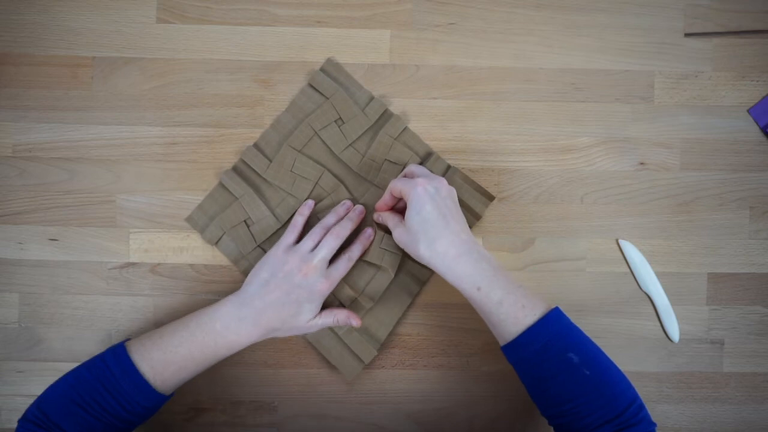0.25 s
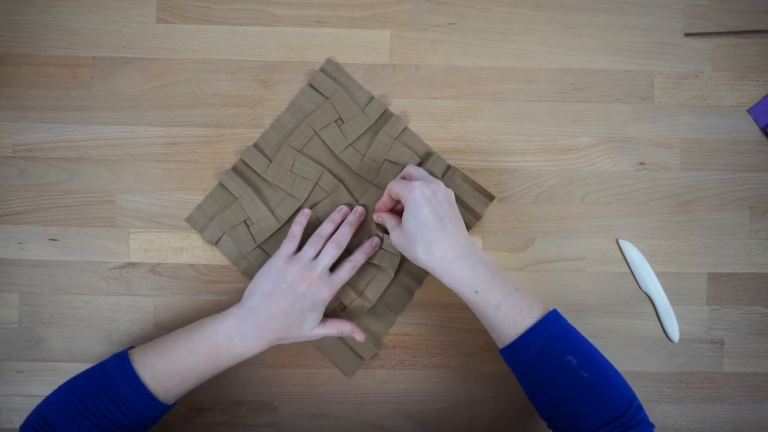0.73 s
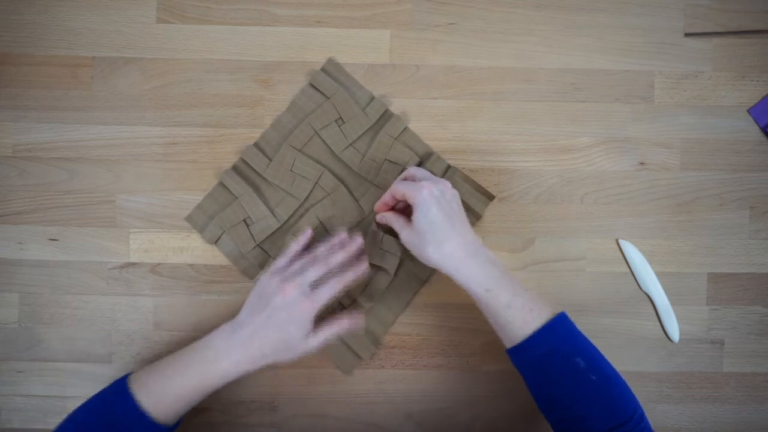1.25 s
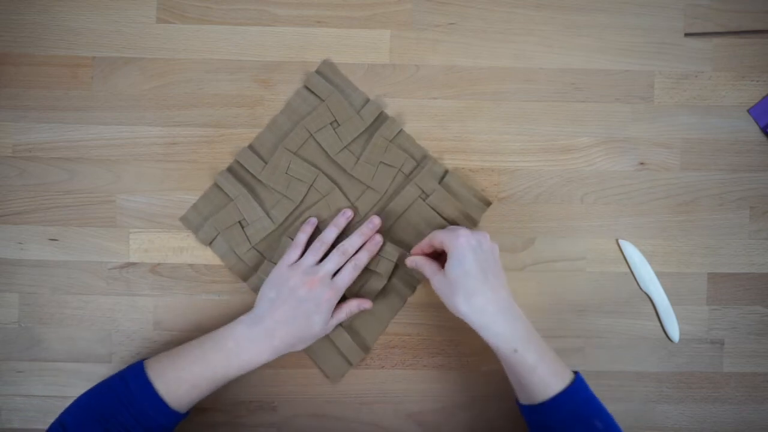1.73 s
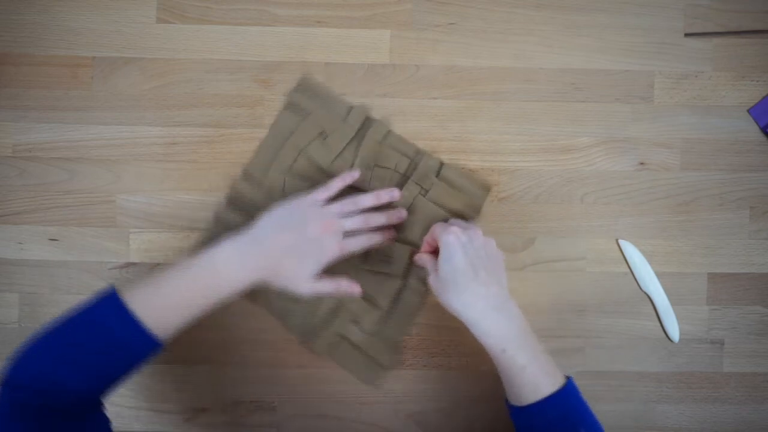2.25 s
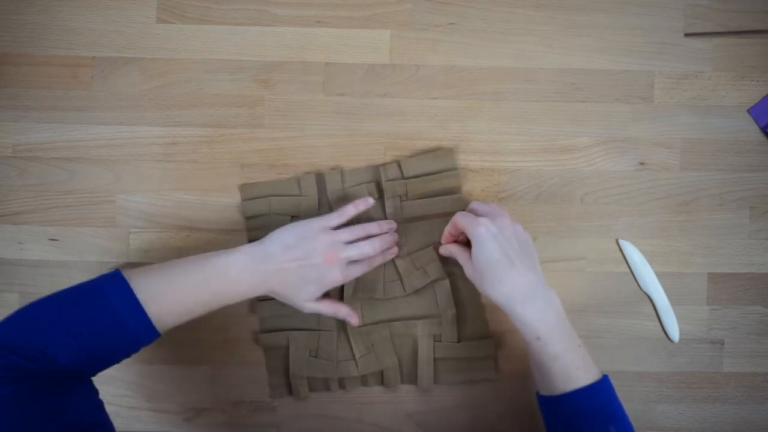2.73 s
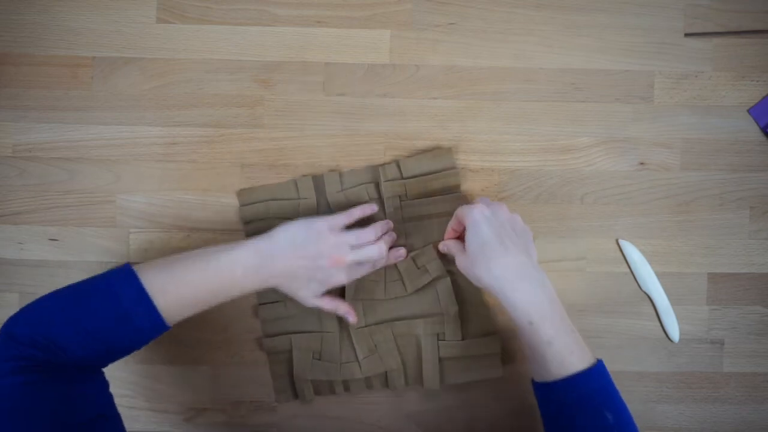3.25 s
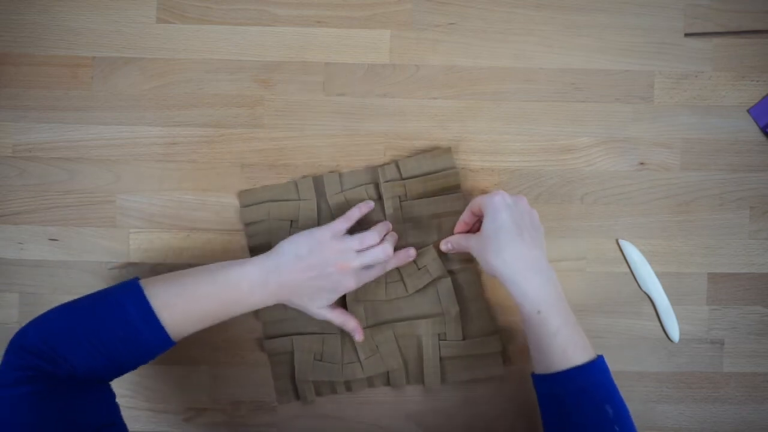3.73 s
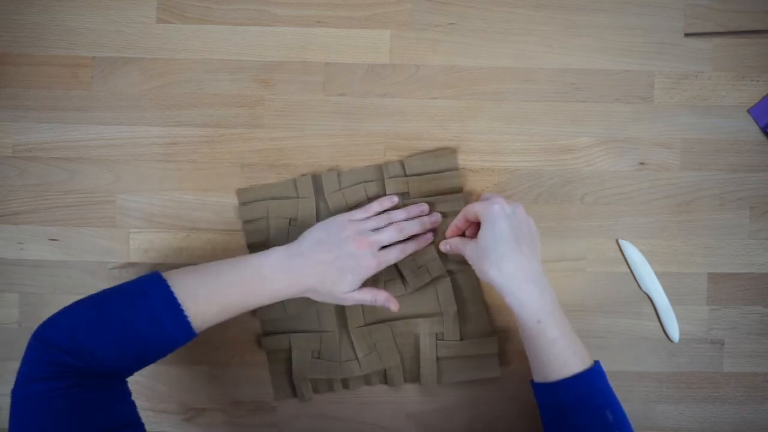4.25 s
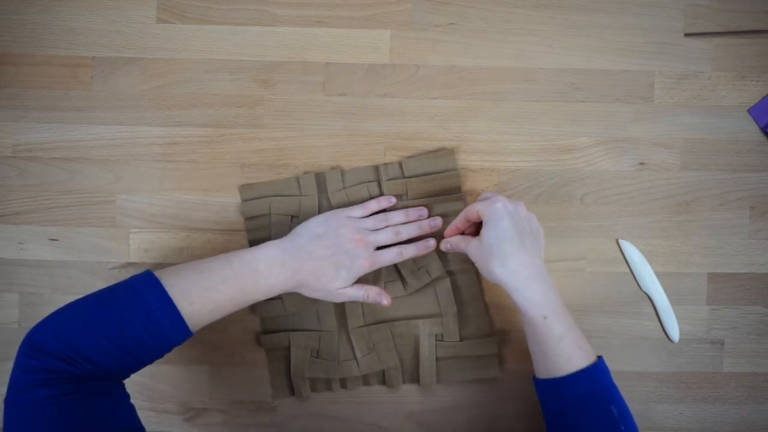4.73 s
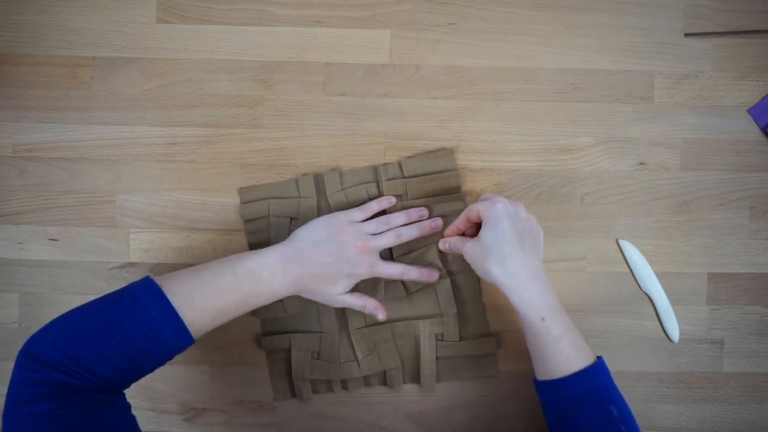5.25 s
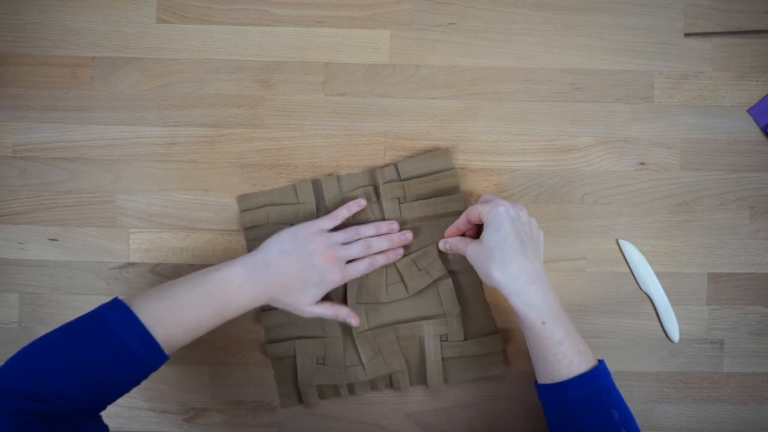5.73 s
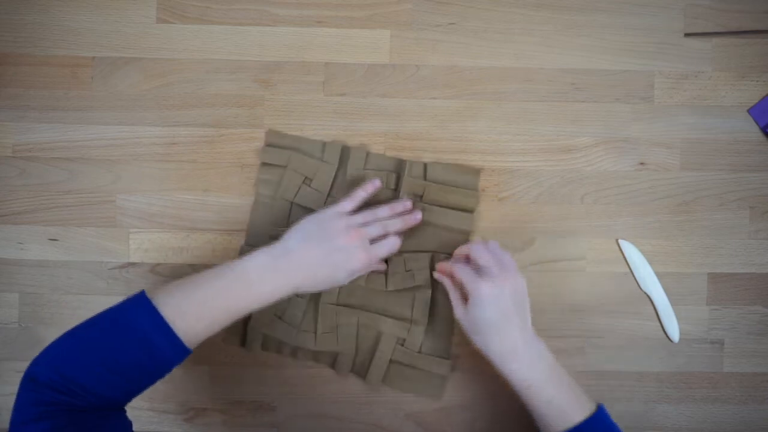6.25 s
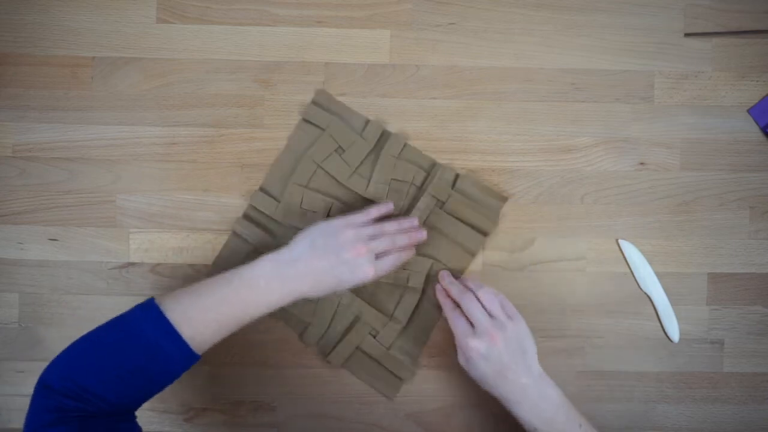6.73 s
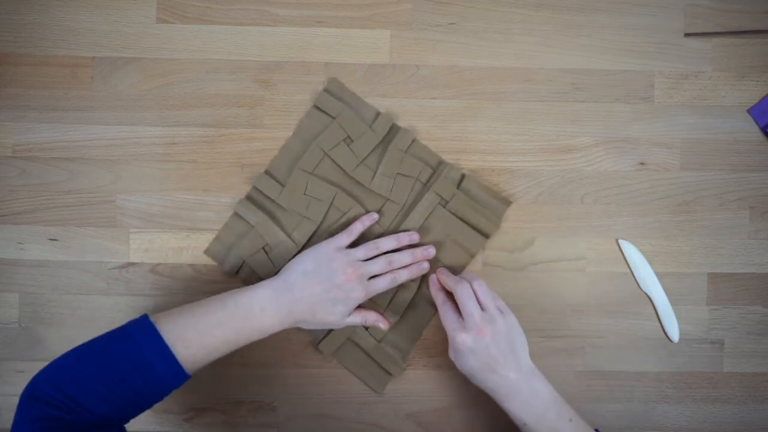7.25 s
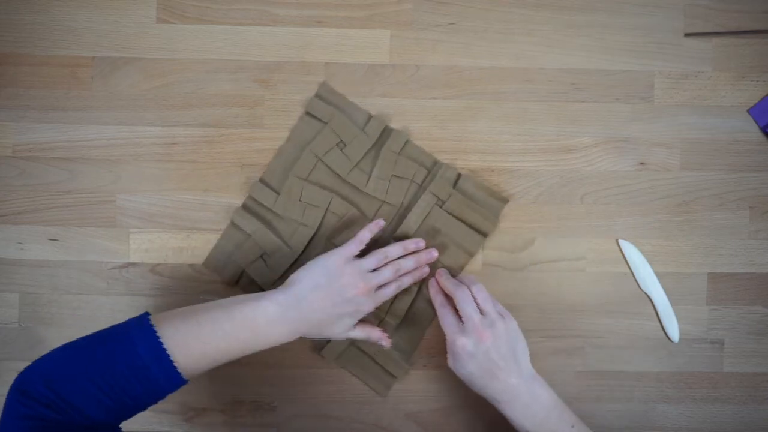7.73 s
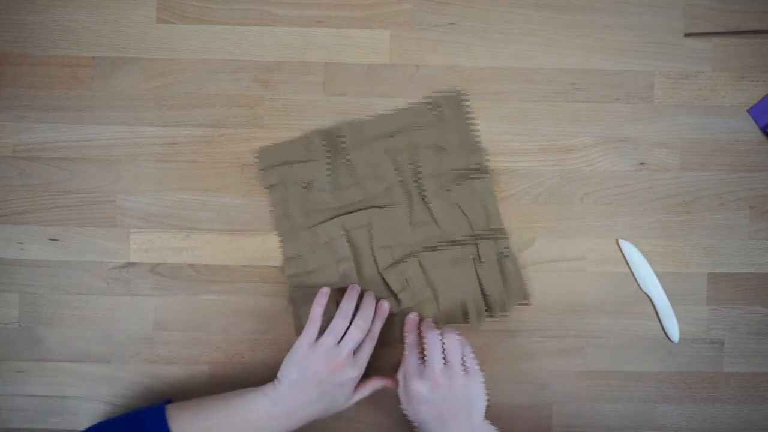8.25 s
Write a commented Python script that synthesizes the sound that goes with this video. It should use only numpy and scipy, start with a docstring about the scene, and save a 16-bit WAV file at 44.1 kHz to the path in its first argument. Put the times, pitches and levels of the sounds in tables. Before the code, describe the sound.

A pleated sheet of stiff paper is folded by hand on a wooden table. It starts with a cluster of crisp pops as the pleats buckle, then the sheet slides over the wood in short, dry swishes. Small crease ticks, soft finger taps and more snaps come irregularly between the rubs. The sound is close, in a small quiet room with low ventilation noise and faint hiss.

```python
"""A pleated sheet of stiff paper is folded by hand on a wooden table, close up in a small quiet room.
Its fibres catch and slip as fingers rub it and swivel it over the wood. Small creases tick, fingers
press pleats against the table, and pleats buckle with short snaps. All of this rings the sheet's
modes and echoes briefly in the room, over low ventilation noise and faint microphone hiss."""
import sys
import numpy as np
from scipy import signal
from scipy.fft import rfft, irfft, next_fast_len
from scipy.io import wavfile
from scipy.ndimage import uniform_filter1d, map_coordinates

SR = 44100
rng = np.random.default_rng(int(sys.argv[2]) if len(sys.argv) > 2 else 0)


def transcribe(signal):
    """Save signal, clipped to [-1, 1], as a 16-bit WAV file at the path in sys.argv[1]."""
    frames = np.atleast_2d(signal).T
    limited = np.clip(frames, -1, 1)
    pcm = np.round(limited * 32767).astype(np.int16)
    wavfile.write(sys.argv[1], SR, pcm)


N = 374409


def amp(db):
    """Decibels to gain."""
    return 10 ** (np.asarray(db) / 20)


def unit(x):
    """Scale to rms 1."""
    return x / np.sqrt(np.mean(x ** 2) + 1e-20)


def along(points, hz):
    """Interpolate (Hz, value) points on a log frequency axis."""
    points_hz, values = np.transpose(points)
    return np.interp(np.log(hz + 1), np.log(points_hz + 1), values)


def wobble(knots_per_s):
    """Smooth random curve."""
    knots = rng.standard_normal(int(N * knots_per_s / SR) + 4)
    return map_coordinates(knots, [np.arange(N) * knots_per_s / SR])


def filtered(x, response):
    """Apply a complex frequency response."""
    size = next_fast_len(N + SR // 2)
    return irfft(rfft(x, size) * response(np.fft.rfftfreq(size, 1 / SR)), size)[..., :N]


def minimum_phase(gain):
    """Causal response with this gain."""
    cepstrum = irfft(np.log(np.maximum(gain, 1e-6)))
    half = len(cepstrum) // 2
    return np.exp(rfft(np.r_[cepstrum[0], 2 * cepstrum[1:half]], len(cepstrum)))


def spread(pair, coherence, hz):
    """Mix two independent spectra into left and right with the given coherence."""
    angle = np.arccos(np.clip(along(coherence, hz), -1, 1)) / 2
    mid, side = pair[0] * np.cos(angle), pair[1] * np.sin(angle)
    return np.array([mid + side, mid - side])


def stereo_noise(spectrum, coherence, grain=1):
    """Coloured noise of rms 1, its excitation scaled by grain."""
    size = next_fast_len(N + SR // 2)
    hz = np.fft.rfftfreq(size, 1 / SR)
    pair = rfft(rng.standard_normal((2, N)) * grain, size) * amp(along(spectrum, hz))
    return unit(irfft(spread(pair, coherence, hz), size)[:, :N])


# Hand strokes. Each row: start in seconds, length in seconds, relative rub level in dB, relative
# fibre hiss level in dB, sharpness (edge over finger pad) in dB, growth over the stroke in dB.
HAND_STROKES = [(0.0, 0.016, -31, -41, 1, -4), (0.042, 0.032, -36.5, -37.5, -1, 1.5),
                (0.217, .11, -50, -63, 3, 6), (0.76, 0.27, -43.5, -53.5, -1, -1),
                (1.05, 0.16, -47.5, -64, 0, 2), (1.198, 0.032, -32, -44.5, -14, -3),
                (1.404, 0.14, -39.5, -46.5, -4, -5), (1.545, .135, -35.5, -43, -0.5, 2.5),
                (1.924, 0.088, -37, -43.5, 0, -3), (2.038, 0.11, -40.5, -55, -2.5, -1),
                (2.204, 0.2, -37.5, -45, 0, -4.5), (2.469, 0.258, -43, -53, 0.5, 14.5),
                (2.786, 0.092, -33, -40, 1, 1.5), (2.846, 0.18, -27.5, -34.5, 1.5, -8),
                (3.001, 0.1, -21, -26, 4, 4), (3.13, 0.087, -45, -54, -1, -3),
                (3.235, 0.02, -38, -38.5, -2, -2), (3.317, 0.099, -50.5, -51.5, 1, -4),
                (3.582, 0.036, -62, -50, 3, 0), (3.703, 0.028, -46.5, -57, 3, -3),
                (3.786, 0.1, -42.5, -52.5, -1, -2), (3.936, 0.14, -43, -52, 8, -3),
                (4.119, 0.15, -47.5, -52, 4, -10), (4.27, 0.042, -38, -50, 13, -5),
                (4.335, 0.054, -39, -47.5, -1, 0), (4.399, 0.068, -33, -40, 6.5, 0),
                (4.495, 0.17, -42, -44.5, 3, -8), (4.729, .06, -37.5, -40.5, -8, -5),
                (4.815, 0.14, -41.5, -41, -4, 1.5), (4.966, 0.29, -47.5, -59.5, 3, -4),
                (5.2, 0.036, -29, -38, 8, 5), (5.276, 0.046, -50, -68, 7, -2.5),
                (5.766, .08, -30, -37.5, 6.5, -3), (5.851, 0.059, -34.5, -44, 10, 0),
                (5.939, 0.04, -43.5, -44, -1, 1), (6.213, 0.14, -41.5, -45.5, -1, 8.5),
                (6.342, 0.11, -38, -48, -3.5, -3.5), (6.521, 0.073, -45, -40.5, -8, 3),
                (6.613, .19, -25.5, -34, 2.5, -3), (6.875, 0.16, -42, -44.5, 1, -7.5),
                (7.038, 0.091, -39, -45, -3, -4), (7.131, 0.19, -25.5, -34, 2, 6),
                (7.382, 0.15, -44, -49.5, 0.5, -4), (7.576, 0.1, -30, -40.5, 4, 4.5),
                (7.721, 0.17, -45.5, -59, -2, 4.5), (8.213, 0.058, -36, -50, -3, 0.5),
                (8.324, 0.059, -36.5, -51, -3, 7)]


def hands(attack_s=0.0057, release_s=0.0088, settle_db=-16, settle_t60_s=0.47):
    """Strokes ease in, grow or fade, and ease out. Returns rub, hiss and sharpness in dB per sample."""
    rest_rub_db, rest_hiss_db = -68, -82  # hands only holding the sheet
    t = np.linspace(0, N / SR, 4000)
    start_s, length_s, rub_db, hiss_db, sharp_db, growth_db = np.transpose(HAND_STROKES)[:, :, None]
    age_s = t - start_s
    ease_s = 0.053 * length_s
    rise = (1 + np.tanh(age_s / (2 * (attack_s + ease_s)))) / 2
    fall = (1 - np.tanh((age_s - length_s) / (2 * (release_s + ease_s)))) / 2
    settle = amp(settle_db - 60 * np.maximum(age_s - length_s, 0) / settle_t60_s)  # pleats keep shifting
    progress = np.clip(age_s / length_s, 0, 1)
    motion = rise * np.maximum(fall, settle) * amp(growth_db * (progress - 0.5))
    stroke_power = (motion * amp(rub_db)) ** 2
    rub_power = stroke_power.sum(0) + amp(rest_rub_db) ** 2
    hiss_power = ((motion * amp(hiss_db)) ** 2).sum(0) + amp(rest_hiss_db) ** 2
    mean_sharp_db = (stroke_power * sharp_db).sum(0) / rub_power
    controls = 10 * np.log10(rub_power), 10 * np.log10(hiss_power), mean_sharp_db
    return [np.interp(np.arange(N) / SR, t, control) for control in controls]


# Spectra of rubbing and of fibre hiss. Each row: frequency in Hz, relative density in dB.
RUB_SPECTRUM = [(200, -31), (450, -14), (780, -9.5), (1000, -4), (1600, 1), (3000, 2), (4200, -1),
                (6000, -9.5), (9000, -16), (16000, -49)]
HISS_SPECTRUM = [(1000, -40), (3000, 2.5), (5000, 2.5), (7000, 0), (10500, 1.5), (13000, 2.5), (15500, 0),
                 (17000, -15.5)]
# Stereo image of the paper. Each row: frequency in Hz, left-right coherence.
PAPER_COHERENCE = [(300, 1), (1200, 0.9), (2400, 0.76), (4500, 0.51), (13000, 0.51)]


def sliding(rub_db, hiss_db, sharp_db, split_hz=2500):
    """Fibres catch and slip densely as the sheet moves; finger pads rub dull, edges scrape bright."""
    pressure_db = 1.23 * wobble(45)  # unsteady hand
    grain = amp(0.49 * wobble(1500))  # single fibres catch
    friction = stereo_noise(RUB_SPECTRUM, PAPER_COHERENCE, grain)
    pad = filtered(friction, lambda hz: 1 / (1 + (hz / split_hz) ** 6))
    edge_gain = amp(sharp_db + 1.04 * wobble(22))
    rub = (pad + edge_gain * (friction - pad)) / np.sqrt((1 + edge_gain ** 2) / 2)
    hiss = stereo_noise(HISS_SPECTRUM, PAPER_COHERENCE, grain) * amp([[0.73], [-0.73]])  # slightly left
    return amp(rub_db + pressure_db - 4) * rub + amp(hiss_db + pressure_db + 1.97) * hiss


# Modes of the sheet. Each row: frequency in Hz, bandwidth in Hz, relative peak gain in dB.
SHEET_MODES = [(783, 50, 3), (980, 34, -2), (1033, 23, 4.5), (1293, 23, -4), (1457, 21, -2), (1537, 56, -4),
               (1607, 31, -24), (1958, 47, 2.5), (2324, 21, -3.5), (2420, 15, -5), (2970, 40, -3.5),
               (3240, 40, -24), (3790, 33, -9), (4650, 69, -11)]


def sheet_ring(x):
    """The stiff sheet rings on in its narrow modes."""
    def response(hz):
        return sum(amp(db) * 1j * hz * width_hz / (mode_hz ** 2 - hz ** 2 + 1j * hz * width_hz)
                   for mode_hz, width_hz, db in SHEET_MODES)
    return filtered(x, response)


# Room decay. Each row: frequency in Hz, T60 in seconds.
ROOM_T60 = [(300, 0.26), (1000, .36), (3000, 0.4), (7000, 0.38), (15000, 0.11)]


def room(x, early_db=4, early_s=0.0089, delay_s=0.004):
    """Strong early reflections from near walls, then a short tail whose top treble dies first."""
    coherence = [(300, 1.0), (1500, 0.8), (5000, 0.13)]
    colour_db = [(500, -1), (1400, 0.5), (3000, -3), (12000, 1.0)]
    hz, t, noise = signal.stft(rng.standard_normal((2, SR // 2)), SR, nperseg=256)
    noise = spread(noise, coherence, hz[:, None])
    fade_db = -60 * t / along(ROOM_T60, hz)[:, None] + early_db * np.exp(-t / early_s)
    tail = signal.istft(noise * amp(fade_db), SR, nperseg=256)[1]
    wet = signal.fftconvolve(x, tail / np.linalg.norm(tail[0]), axes=1)[:, :N]
    return filtered(wet, lambda f: np.exp(-2j * np.pi * f * delay_s) * amp(along(colour_db, f)))


# Background spectrum. Each row: frequency in Hz, relative density in dB.
AIR_SPECTRUM = [(20, -20), (30, 1), (40, -4), (50, -3), (70, -1), (150, -4), (240, -9), (400, -4),
                (560, -9.5), (900, -10), (1500, -17), (2500, -21), (6000, -28), (16000, -32.5)]
# Stereo image of the background. Each row: frequency in Hz, left-right coherence.
AIR_COHERENCE = [(40, .998), (70, 1), (140, 0.91), (300, 0.76), (1000, 0.22), (5000, 0.048)]
# Room drone. Each row: frequency in Hz, rms level in dB.
DRONE_TONES = [(41, -70), (73, -62), (112, -75), (158, -64), (244, -63)]


def ventilation():
    """Low ventilation noise with a wavering drone and faint microphone hiss."""
    t = np.arange(N) / SR
    drone = np.zeros(N)
    for hz, db in DRONE_TONES:
        phase = 2 * np.pi * hz * t
        drone += amp(db) * unit(wobble(7) * np.sin(phase) + wobble(7) * np.cos(phase))
    return amp(-48.5) * stereo_noise(AIR_SPECTRUM, AIR_COHERENCE) + drone


def burst(colour_db, t60_s, attack_s, size=8192):
    """A dying flurry of slips, coloured by colour_db(hz), with the energy of 6 ms at rms 1."""
    t, hz = np.arange(size) / SR, np.fft.rfftfreq(size, 1 / SR)
    envelope = amp(-60 * t / t60_s) * (1 - np.exp(-t / attack_s))
    slips = rfft(rng.standard_normal((2, size)) * envelope)
    # Whiten the slips so that colour_db alone sets the broad spectrum.
    power = np.abs(uniform_filter1d(np.abs(slips) ** 2, size=70))
    pair = slips * np.array([minimum_phase(amp(colour_db(hz)) / np.sqrt(p)) for p in power])
    pair /= np.linalg.norm(pair, axis=1, keepdims=True)
    return unit(irfft(spread(pair, PAPER_COHERENCE, hz))) * np.sqrt(0.006 * SR / size)


def facet_pop(pitch_hz, t60_s, attack_s, size=8192, highpass_order=2.69, lowpass_order=3.57):
    """A buckling facet radiates a broad spectral hump about its pitch."""
    def hump_db(hz):
        ratio = (hz + 1) / pitch_hz
        bass_loss = 1 + (0.73 / ratio) ** (2 * highpass_order)
        treble_loss = 1 + (ratio / 1.545) ** (2 * lowpass_order)
        return -10 * np.log10(bass_loss * treble_loss)
    return burst(hump_db, t60_s, attack_s, size)


def add(track, start_s, sound):
    """Mix a sound into the track."""
    part = track[:, round(start_s * SR):][:, :sound.shape[1]]
    part += sound[:, :part.shape[1]]


def tick(pitch_hz):
    """One small crease gives way."""
    return facet_pop(pitch_hz, t60_s=0.036, attack_s=0.0002, size=1024)


# Distinct crease ticks. Each row: start in seconds, level in dB, pitch in Hz.
CREASE_TICKS = [(0.445, -51, 2200), (1.662, -32, 2900), (3.245, -38.5, 2400), (3.495, -46, 3550),
                (4.832, -35, 3270), (5.122, -48, 3600)]


def crinkles(rub_db, max_per_s=20, trials=400):
    """A few creases tick clearly; tinier ones give way at random, more often under harder rubbing."""
    track = np.zeros((2, N))
    for start_s, db, pitch_hz in CREASE_TICKS:
        add(track, start_s, amp(db) * tick(pitch_hz))
    max_chance = max_per_s * N / SR / trials
    for position, draw, strength, pitch in rng.random((trials, 4)):
        effort_db = rub_db[int(position * N)]
        if draw < max_chance * np.clip((effort_db + 52) / 16, 0, 1):
            db = min(effort_db, -28) - 13.5 + 8 * strength ** 2
            add(track, position * N / SR, amp(db) * tick(1600 * 3 ** pitch))
    return track


# Spectrum of the table top. Each row: frequency in Hz, relative density in dB.
KNOCK_SPECTRUM = [(80, -24), (250, -17), (450, -1), (800, -4), (1300, -26), (4000, -35)]


def table_knock():
    """The struck wood answers with a dull thud."""
    return amp(-4) * burst(lambda hz: along(KNOCK_SPECTRUM, hz), t60_s=0.035, attack_s=0.0014)


def facet_ring(ring_hz, log_width=0.13):
    """One facet rings briefly in a cluster of close modes."""
    def cluster_db(hz):
        return -20 * np.log10(1 + (np.log((hz + 1) / ring_hz) / log_width) ** 2)
    return burst(cluster_db, t60_s=0.068, attack_s=0.00054)


# Finger landings. Each row: start in seconds, relative level in dB, pleat ring in Hz.
FINGER_TAPS = [(0.5393, -32.5, 700), (1.627, -38.5, 1504), (2.222, -37.5, 1000), (4.303, -39.5, 777),
               (4.343, -36, 433), (5.771, -33, 780), (8.371, -38.5, 856)]


def taps():
    """A finger lands with a papery click and presses a pleat against the table."""
    track = np.zeros((2, N))
    for start_s, db, ring_hz in FINGER_TAPS:
        click = facet_pop(pitch_hz=1530, t60_s=0.048, attack_s=0.00074)
        add(track, start_s, amp(db) * (table_knock() + amp(-9) * facet_ring(ring_hz) + amp(-7) * click))
    return track


# Spectrum of cracking fibres. Each row: frequency in Hz, relative density in dB.
CRACK_SPECTRUM = [(800, -78), (3000, 3), (6000, 2.5), (10500, 5), (13000, 8.5), (16000, 5)]


def fibre_crack(t60_s, attack_s):
    """Fibres give way in a bright burst."""
    return burst(lambda hz: along(CRACK_SPECTRUM, hz), t60_s, attack_s)


# Buckling pleats. Each row: start in seconds, relative pop level in dB, pop pitch in Hz,
# crack level in dB, relative knock level in dB, facet ring in Hz, ring level in dB.
PLEAT_SNAPS = [(0.571, -15.5, 1710, -43, -40, 2870, -26), (0.583, -35, 1500, -59, -57, 1380, -24.5),
               (0.619, -20.5, 2150, -44, -58, 1450, -31.5), (0.7654, -16.5, 1620, -49, -41, 1520, -27.5),
               (0.9367, -24.5, 1690, -60.5, -51, 1050, -39.5), (1.138, -16.5, 2350, -41, -29, 1390, -27.5),
               (1.1768, -19.5, 2460, -36, -38, 2730, -26.5), (1.224, -31, 1130, -60, -46, 1010, -37.5),
               (1.2857, -13, 2150, -40, -29.5, 1056, -24), (1.997, -31, 1570, -55, -47, 1470, -42),
               (2.372, -32.5, 2760, -39, -44, 1320, -42), (2.66, -33, 2260, -43, -43, 2420, -39),
               (2.703, -34.5, 1450, -45, -52, 1500, -45), (3.1676, -29, 2370, -50, -50, 2890, -49.5),
               (3.5195, -39.5, 1560, -55, -49, 2960, -50), (3.6981, -43.5, 1340, -50, -41.5, 940, -56),
               (3.8642, -32.5, 1460, -64, -60, 965, -42.5), (4.0632, -26, 1410, -62, -55, 1690, -41.5),
               (4.271, -35, 2810, -46, -53, 3000, -43), (4.5761, -30.5, 2040, -50.5, -33.5, 580, -38.5),
               (4.7223, -37, 2720, -39, -52, 1005, -44), (4.8735, -21, 2840, -20.5, -40.5, 3800, -38),
               (5.7582, -20, 2350, -32, -36, 983, -36.5), (5.9961, -20, 2550, -40, -38, 3230, -38),
               (7.0213, -17.5, 2340, -20, -38, 2040, -32), (8.073, -32, 1210, -66, -61, 2980, -39),
               (8.181, -13.5, 2070, -41.5, -33.5, 1480, -30), (8.3868, -18.5, 2820, -33.5, -52, 2700, -39)]


def snaps(firm_db=-17.5, firm_t60_s=0.017, db_per_doubling=24, strain_lead_s=0.003):
    """Each pleat strains, pops through, cracks its fibres, knocks the table and rings briefly."""
    track = np.zeros((2, N))
    for start_s, pop_db, pitch_hz, crack_db, knock_db, ring_hz, ring_db in PLEAT_SNAPS:
        t60_s = firm_t60_s * 2 ** ((firm_db - pop_db) / db_per_doubling)  # weaker pops last longer
        pop = amp(pop_db - 5.5) * facet_pop(pitch_hz, t60_s, attack_s=0.00049)
        crack = amp(crack_db) * fibre_crack(t60_s=0.014, attack_s=0.0003)
        knock = amp(knock_db) * table_knock()
        ring = amp(ring_db) * facet_ring(ring_hz)
        strain = amp(crack_db - 15) * fibre_crack(t60_s=0.02, attack_s=0.002)
        add(track, start_s - strain_lead_s, strain)
        add(track, start_s, pop + crack + knock + ring)
        add(track, start_s + rng.uniform(0.0007, 0.00199), 0.2 * pop)  # quick echo off the table top
    return track


def scene():
    """Sliding, snaps, taps and crinkles excite the sheet and the room, over the ventilation."""
    rub_db, hiss_db, sharp_db = hands()
    slide = sliding(rub_db, hiss_db, sharp_db)
    slide += amp(0.5) * sheet_ring(slide)
    pops = snaps() + taps() + crinkles(rub_db)
    pops += amp(-3) * sheet_ring(pops)
    reverb = amp(-3.5) * room(pops) + amp(-8.5) * room(slide)
    return slide + pops + reverb + ventilation()


def record(dry):
    """Brick-wall low-pass at 16 kHz."""
    return filtered(dry, lambda hz: hz < 16000)


dry = scene()
out = record(dry)
transcribe(out)
```